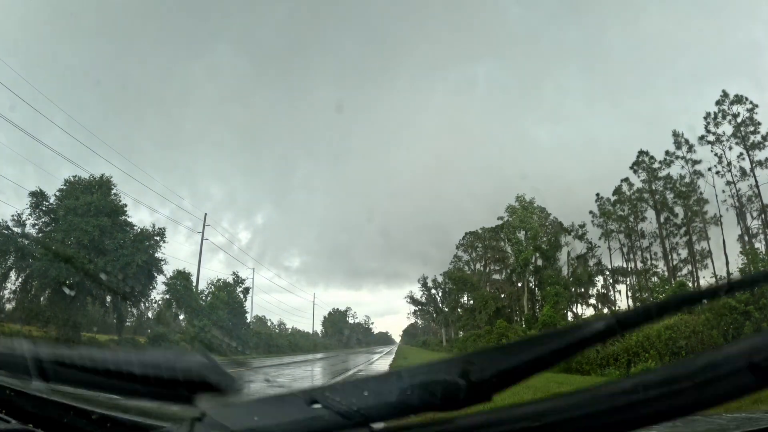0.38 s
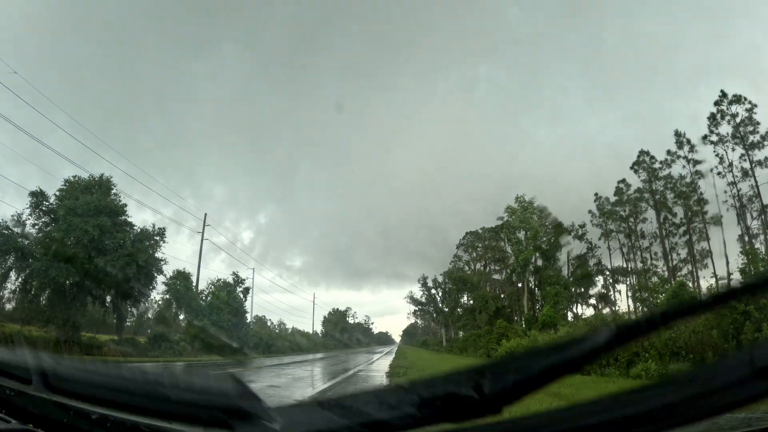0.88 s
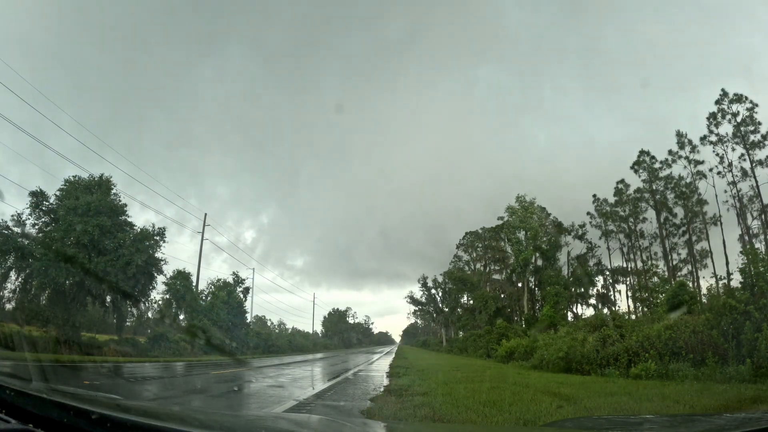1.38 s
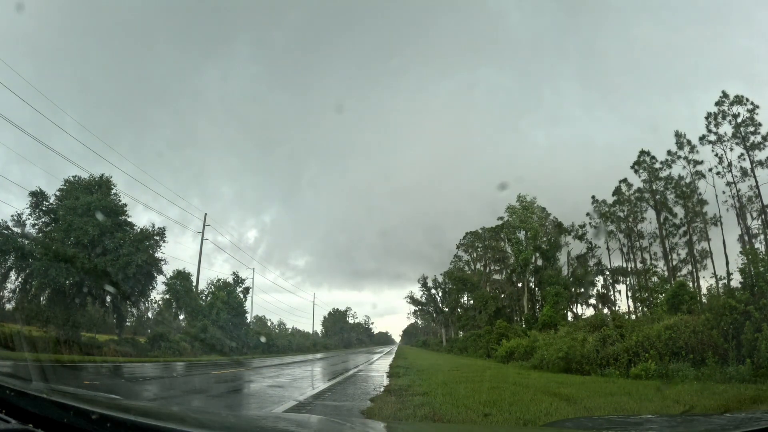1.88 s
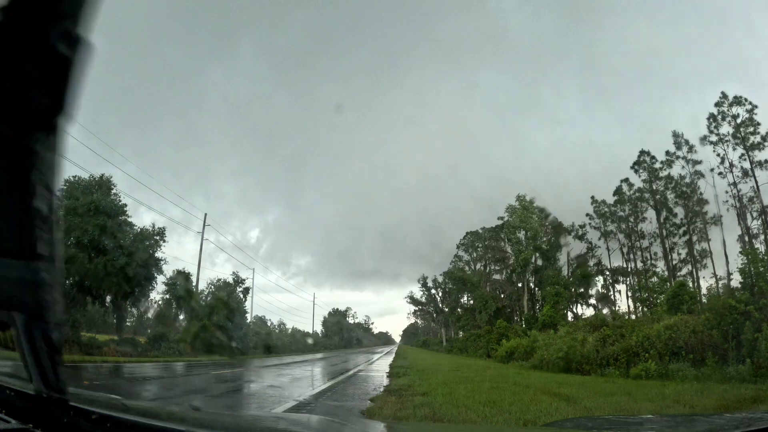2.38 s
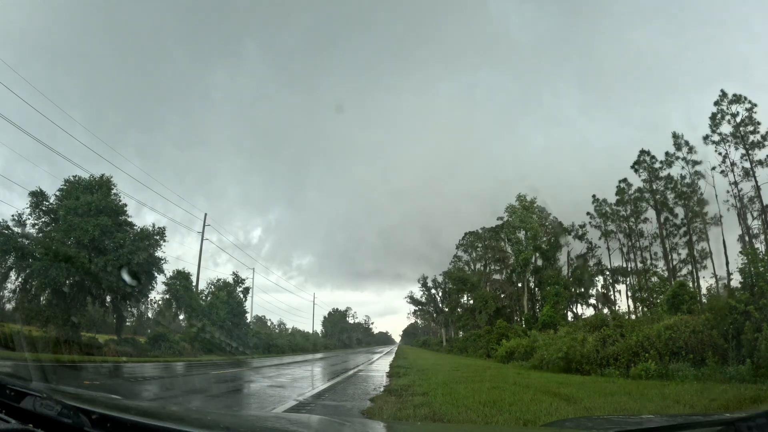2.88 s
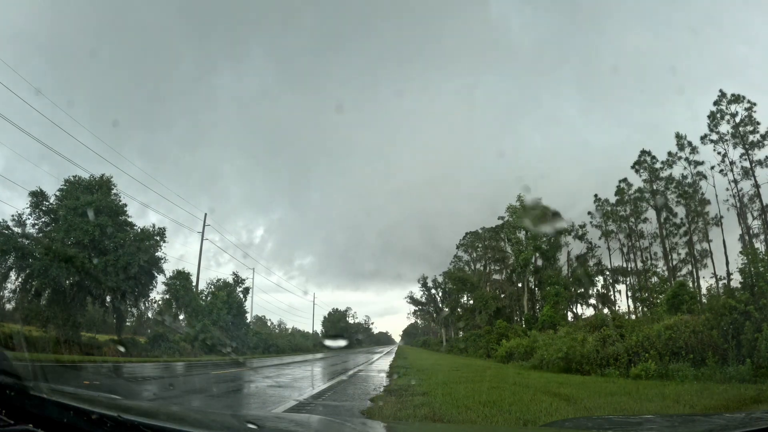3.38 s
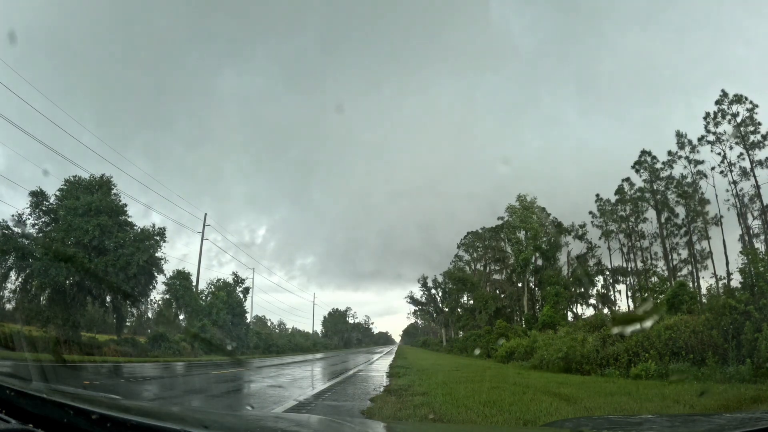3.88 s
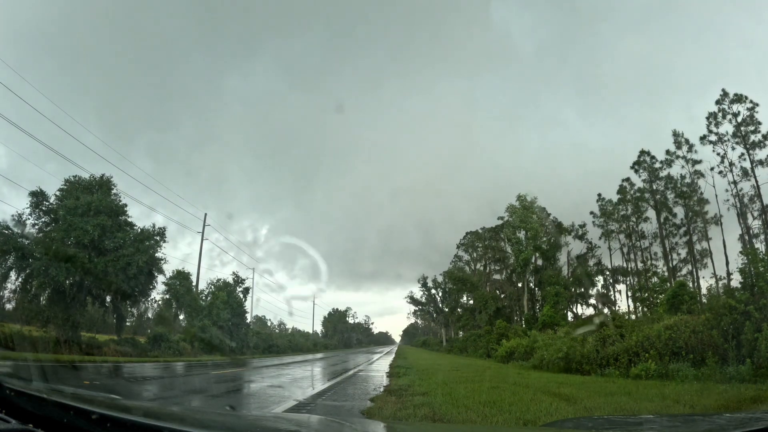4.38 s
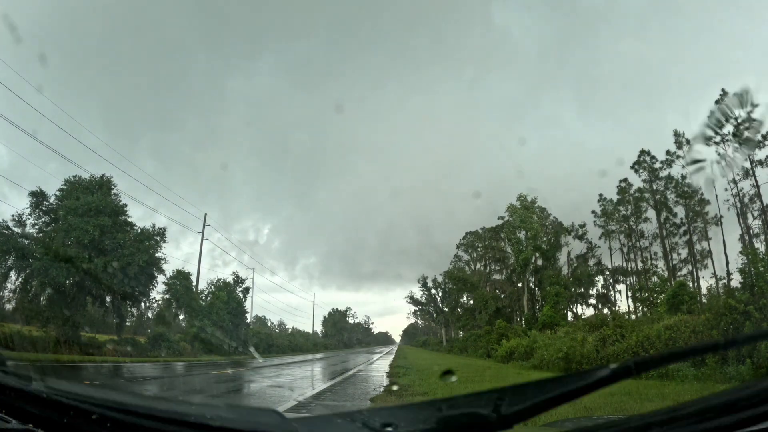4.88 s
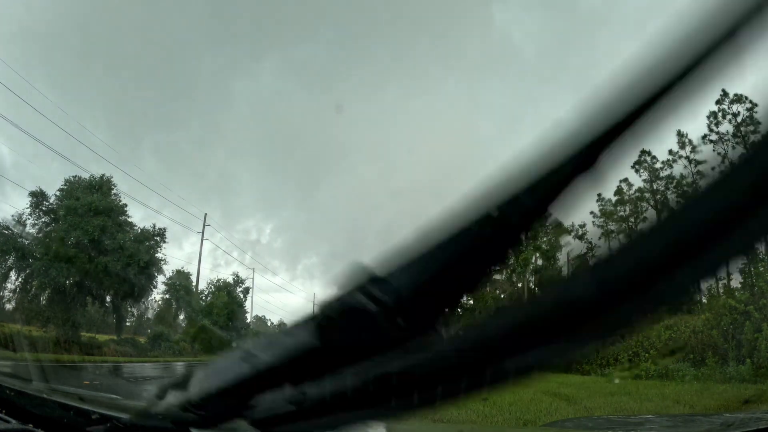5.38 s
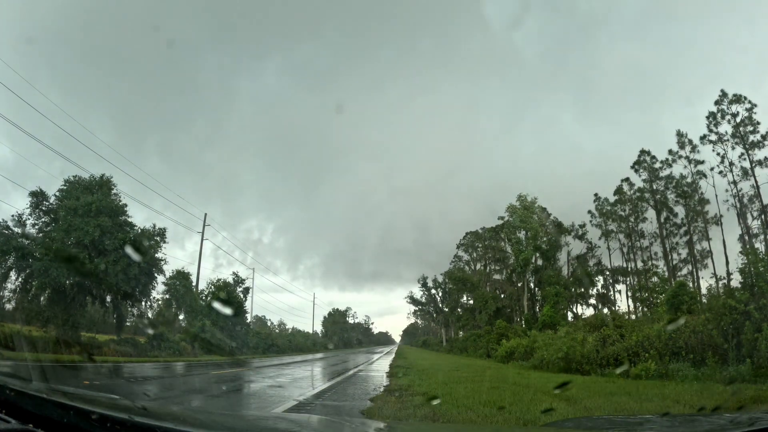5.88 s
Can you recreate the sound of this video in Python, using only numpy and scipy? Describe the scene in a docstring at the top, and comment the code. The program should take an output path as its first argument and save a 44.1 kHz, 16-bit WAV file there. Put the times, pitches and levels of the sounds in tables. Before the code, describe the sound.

Inside a parked car, heavy rain patters on roof and glass while fast wipers thud and clack over a deep idling engine.

```python
"""Heavy rain on a parked car, heard in the cabin: enveloped noise patters on roof and glass, large drops splat and tap.
Wipers knock and click several times at each turn: short noise bursts excite the modes of cowl and linkage.
The engine idles with a deep boom, a sum of shaft orders; a valve ticks at a fixed beat as decaying modes.
Faint steady sines hum and beat beside it, filtered noise rumbles low,
and a hiss of road spray, resonant noise, fades away at the start."""
import sys
import numpy as np
from scipy import signal
from scipy.fft import rfft, irfft
from scipy.io import wavfile
from scipy.ndimage import uniform_filter1d

SR = 44100
rng = np.random.default_rng(int(sys.argv[2]) if len(sys.argv) > 2 else 0)


def waveform_to_disk(signal):
    """Save audio, clipped to [-1, 1], as 16-bit WAV at the path in sys.argv[1]."""
    frames = np.transpose(np.atleast_2d(signal))
    scaled = np.clip(frames, -1, 1) * 32767
    samples = np.round(scaled).astype(np.int16)
    wavfile.write(sys.argv[1], SR, samples)


def decibels_to_gain(level_db):
    """Convert a level in decibels to a linear amplitude gain (20 dB per decade)."""
    exponent = np.asarray(level_db, float) / 20
    return 10 ** exponent


N = 275184  # length of the scene [samples]


def evened(x):
    """Normalization of signal power: scales to rms 1."""
    return x / np.sqrt(np.mean(x ** 2) + 1e-20)


def read(points, hz):
    """Logarithmic frequency scale: interpolates a table evenly along it."""
    f, value = np.transpose(points)
    return np.interp(np.log(hz + 1), np.log(f + 1), value)


def curve(rows, column):
    """Linear interpolation in time: reads one column of a time table at every sample."""
    rows = np.array(rows)
    return np.interp(np.arange(N) / SR, rows[:, 0], rows[:, column])


def add(mix, s, sound):
    """Superposition: adds a sound to the mix, starting at time s [s]."""
    part = mix[..., round(s * SR):][..., :sound.shape[-1]]
    part += sound[..., :part.shape[-1]]


def resonate(x, hz, width):
    """Heterodyne resonance of gain 1: shifts hz down to zero, smooths, and shifts back."""
    carrier = np.exp(2j * np.pi * np.cumsum(hz * np.ones(x.shape[-1])) / SR)
    pole = np.exp(-np.pi * width / SR)
    smoothed = signal.lfilter([1 - pole], [1, -pole], x / carrier)
    return 2 * (carrier * smoothed).real


def body(x, modes):
    """Modal superposition: sums steep resonances, each of two passes wider than their result."""
    total = 0
    for hz, width, db in modes:
        once = resonate(x, hz, 1.5 * width)
        total = total + decibels_to_gain(db) * resonate(once, hz, 1.5 * width)
    return total


def tint(x, table):
    """Spectral shaping: multiplies the spectrum by a table, then scales to rms 1."""
    gain = decibels_to_gain(read(table, np.fft.rfftfreq(N, 1 / SR)))
    return evened(irfft(rfft(x) * gain, N))


def patter(per_s, spread_db, splash_s, smooth):
    """Poisson-like shot noise: random hits of uneven size, each a decaying noisy splash, over a smooth wash."""
    size = decibels_to_gain(spread_db * np.minimum(rng.exponential(1, N), 4))
    hits = size * (rng.random(N) < per_s / SR)
    # energies of overlapping splashes add; the root makes splash_s the amplitude decay time
    energy = signal.lfilter([1], [1, -np.exp(-2 / (splash_s * SR))], hits ** 2)
    splash = np.sqrt(abs(energy))
    return (evened(splash) + smooth) * rng.standard_normal((2, N))


def rain():
    """Impact noise split by panel: the padded roof drums dully, the glass ticks brightly; gusts change mostly the glass."""
    # spectrum of the rain wash: (frequency [Hz], relative density [dB])
    wash = [(90, -14), (125, -12), (180, -15), (290, -20), (750, -33.5), (1040, -33.5), (1570, -42),
            (2650, -48), (3800, -51.5), (4600, -51), (6000, -48.5), (9000, -50.5), (15000, -49.5)]
    # gusts in the rain: (time [s], strength on the glass [dB])
    gusts = [(0, .5), (.43, 0), (.83, -3), (1.67, 2), (2.4, 2), (2.8, 0), (4.66, .5), (5.2, 3), (5.96, 1),
             (6.24, 1)]
    roof = tint(patter(per_s=200, spread_db=1.5, splash_s=0.01, smooth=0.57), wash)
    glass = tint(patter(per_s=400, spread_db=4.5, splash_s=0.011, smooth=0.84), wash)
    low = signal.butter(2, 1700, "low", fs=SR, output="sos")
    high = signal.butter(2, 1700, "high", fs=SR, output="sos")
    strength_db = curve(gusts, 1)
    dull = signal.sosfilt(low, roof) * decibels_to_gain(0.27 * strength_db)
    bright = signal.sosfilt(high, glass) * decibels_to_gain(strength_db)
    return decibels_to_gain(-34) * (dull + bright)


def splats():
    """Impact and spreading of a large drop: a sharp noise burst with a dull slap and a bright spit on top."""
    # large drops: (time [s], slap peak [dB], spit peak [dB], left over right [dB])
    large_drops = [(.402, -43, -46, -8), (1.045, -45, -40, -1), (1.691, -44, -47, 0), (2.08, -50, -43, -1),
                   (3.207, -41.5, -36, 5), (3.674, -45, -36.5, 5), (4.293, -34, -26.5, 5),
                   (4.556, -52, -34, 4), (4.617, -41, -43, 4), (4.8345, -38, -29, 12),
                   (4.953, -41, -36, -1), (5.101, -41, -37, -3), (5.355, -32.5, -27.5, 5),
                   (5.453, -44, -44, 12), (5.726, -49, -41, 4), (5.817, -42, -40, 6),
                   (5.837, -36, -23.5, 2.5)]
    t, out = np.arange(2000) / SR, np.zeros((2, N))
    shape = (1 - np.exp(-t / .0004)) * (np.exp(-t / .003) + .2 * np.exp(-t / .012))
    mid = signal.butter(2, [700, 3800], "band", fs=SR, output="sos")
    high = signal.butter(1, [4000, 11000], "band", fs=SR, output="sos")
    for s, slap_db, spit_db, pan_db in large_drops:
        left, own = rng.standard_normal((2, len(t)))
        burst = np.array([left, .8 * left + .6 * own]) * shape  # sides are alike by 0.8
        slap, spit = signal.sosfilt(mid, burst), signal.sosfilt(high, burst)
        drop = decibels_to_gain(slap_db) * slap / abs(slap).max() + decibels_to_gain(spit_db) * spit / abs(spit).max()
        add(out, s, drop * decibels_to_gain([[pan_db / 2], [-pan_db / 2]]))
    return out


def knocks(table, focus_db, share):
    """Modal excitation: a short stutter drives the cowl; where it lands decides which modes ring most.

    focus_db is the loss of a mode one octave from the strongest region [dB]."""
    # modes of the cowl and arms: (frequency [Hz], width [Hz], level before the focus loss [dB])
    cowl = [(88, 16, 6), (108, 20, 3), (142, 30, 0), (172, 35, 0), (205, 45, 0), (280, 80, 0), (400, 90, 0),
            (520, 100, 0), (760, 100, 0), (950, 60, 5), (1300, 250, -2)]
    t, out = np.arange(4400) / SR, np.zeros((2, N))
    for s, db, centre_hz, length_ms in table:
        stutter = rng.standard_normal((2, len(t)))
        rise = share * max(length_ms, 2) / 1000  # time to the peak of the stutter [s]
        modes = [(hz, width, level - focus_db * np.log2(hz / centre_hz) ** 2) for hz, width, level in cowl]
        ring = body(stutter * (t / rise) ** 2 * np.exp(-2 * t / rise), modes)
        loudness = uniform_filter1d(ring[0] ** 2, 300)
        start_s = max(s - loudness.argmax() / SR, 0)  # puts the loudest moment at s
        add(out, start_s, decibels_to_gain(db) * ring / np.sqrt(2 * loudness.max()))
    return out


def cowl_taps():
    """Localized impact: heavy drops tap the cowl and ring its nearest modes."""
    # taps: (time of the peak [s], level [dB], strongest region [Hz], length [ms], at least 2 in use)
    taps = [(1.009, -41, 433, 3.5), (1.394, -37, 605, 16), (3.029, -36.5, 1406, 1.3),
            (3.295, -49, 1050, 8.5), (4.3, -35.5, 480.3, 4.6), (5.822, -33.5, 499.3, 9),
            (6.046, -38.5, 1340, 2.3), (6.189, -42.5, 504, 8)]
    return knocks(taps, focus_db=24.5, share=.5)


def turns_of(steps, levels):
    """Periodic excitation: the wiper motor's steady clock gives every turn the same steps.

    Returns rows (time [s], level [dB], rest of the step)."""
    first_s, every_s = .199, .6458
    rows = []
    for k, row in enumerate(levels):
        for (delay_s, *rest), db in zip(steps, row):
            rows.append((first_s + k * every_s + delay_s, db, *rest))
    return rows


def arm_thuds():
    """Low-mode impact: the arms thud at stop, blade flip, latch, pull and slack taken up."""
    # steps of a turn: (time after the turn [s], strongest region [Hz], length [ms])
    thud_steps = [(.010, 132, 14), (.066, 172, 11), (.107, 138, 12), (.268, 150, 10), (.291, 173.3, 8.4)]
    # one row per turn: (level of each step [dB], ..)
    thud_levels = [(-22, -34.5, -25, -24, -26), (-20.5, -15, -33.5, -24, -27),
                   (-24.5, -21.5, -23.5, -22.5, -21), (-22, -25.5, -24, -29.5, -22),
                   (-15, -31, -29.5, -26.5, -18.5), (-22.5, -29, -21.5, -23, -30),
                   (-17, -16.5, -19, -24, -21), (-20.5, -18.5, -18.5, -26, -24),
                   (-23.5, -24, -27, -21.5, -22), (-16, -30.5, -19.5)]
    # soft thud as the arms slow before each stop: (time after the turn [s], strongest region [Hz], length [ms])
    wind_up = (-.035, 170, 8)
    soft = turns_of([wind_up], [[-28.5]] * len(thud_levels))
    return knocks(turns_of(thud_steps, thud_levels) + soft, focus_db=26, share=.45)


def arm_clacks():
    """Mid-mode impact: clacks at stop, blade flip, latch, pull and slack taken up."""
    # steps of a turn: (time after the turn [s], strongest region [Hz], length [ms])
    clack_steps = [(.002, 592, 3.9), (.069, 512, 9.1), (.102, 461, 5.3), (.272, 449, 6), (.293, 510, 13)]
    # one row per turn: (level of each step [dB], ..)
    clack_levels = [(-30.5, -30.5, -40, -43, -33.5), (-34, -37.5, -36, -36, -35),
                    (-32.5, -30, -37.5, -39.5, -40), (-30, -34.5, -37.5, -33.5, -36),
                    (-31, -34, -38.5, -34.5, -37.5), (-34.5, -45.5, -37.5, -44.5, -32),
                    (-32, -37.5, -36, -35, -33.5), (-33.5, -25, -40, -32.5, -36),
                    (-29.5, -36.5, -36.5, -37.5, -34), (-36.5, -42.5, -35.5)]
    return knocks(turns_of(clack_steps, clack_levels), focus_db=24.5, share=.5)


def flip_rings():
    """Selective resonance: the flipping blade rings hollow, in a narrow choice of modes."""
    # ring of the blade: (time after the turn [s], strongest region [Hz], length [ms])
    flip_step = (.065, 1000, 9)
    # one value per turn: level [dB]
    flip_levels = [-43, -42, -34, -30.5, -53, -52, -40, -38, -42, -54]
    return knocks(turns_of([flip_step], [[db] for db in flip_levels]), focus_db=88.5, share=.5)


def clicks():
    """Metal-on-metal excitation: a short scrape rings the linkage and a ping at a pivot, nearer the left."""
    # steps at stop, latch, pull and slack taken up: (time after the turn [s], ping over the click [dB])
    click_steps = [(-.001, -20.5), (.0935, -7.5), (.263, -19.5), (.281, -20.5)]
    # one row per turn: (click peak of each step before the lean to the left [dB], ..)
    click_levels = [(-41, -38, -42, -33), (-43.5, -40, -38, -36.5), (-38.5, -38.5, -40, -39),
                    (-51, -40.5, -48, -38), (-41, -38.5, -47, -38), (-41, -39.5, -48, -42),
                    (-47, -37.5, -39, -42), (-58, -37, -40, -38), (-39, -41, -48, -37), (-51, -51)]
    # modes of the linkage, and of the pivot: (frequency [Hz], width [Hz], level [dB])
    linkage = [(1300, 400, 0), (1750, 400, 0), (2100, 400, -1), (2700, 700, -8)]
    pivot = [(3450, 170, 0)]
    t, out = np.arange(1500) / SR, np.zeros((2, N))
    for s, db, ping_db in turns_of(click_steps, click_levels):
        scrape = rng.standard_normal(len(t)) * t * np.exp(-t / .0016)  # strongest at 1.6 ms
        click, ping = body(scrape, linkage), body(scrape, pivot)
        strike = click / abs(click).max() + decibels_to_gain(ping_db) * ping / abs(ping).max()
        add(out, s, decibels_to_gain(db) * strike * decibels_to_gain([[2], [-2.5]]))
    return out


def engine():
    """Harmonic series of shaft orders: near-pure tones waver together; the cabin boom lifts the sixth."""
    # idle speed: (time [s], shaft speed [turns a minute])
    speed = [(.17, 705), (.45, 717), (.9, 720), (1.35, 687), (1.95, 699), (2.25, 677), (2.8, 725),
             (3.15, 697), (3.7, 711), (4.65, 692), (5.25, 717), (5.85, 706)]
    # shaft orders: (multiple of the shaft speed, mean level [dB rms])
    orders = [(2, -55), (3, -49.5), (4, -38), (5, -52.5), (6, -22), (7, -46.5), (8, -63.5)]
    turns = np.cumsum(curve(speed, 1)) / (60 * SR)
    waver = evened(uniform_filter1d(uniform_filter1d(rng.standard_normal(N), 3000), 3000))
    tones = sum(decibels_to_gain(db) * np.cos(2 * np.pi * (k * turns + rng.random())) for k, db in orders)
    return np.sqrt(2) * tones * decibels_to_gain(0.63 * waver)  # waver of 0.63 dB rms


def valve():
    """Impulse response of damped modes: a small valve snaps on a steady clock and rings briefly."""
    # valve modes: (mean frequency [Hz], damping width [Hz], mean envelope peak before the lean to the left [dB])
    valve_modes = [(2420, 120, -54.5), (5760, 170, -56), (6130, 150, -49.5), (8400, 200, -56)]
    t, out = np.arange(1500) / SR, np.zeros(N)
    first_s, every_s = .0685, .17492
    for s in np.arange(first_s, N / SR, every_s):
        for hz, width, db in valve_modes:
            luck = rng.standard_normal()  # moves level and pitch of each mode at each tick
            u = np.pi * width * t
            envelope = u * np.exp(1 - u)  # peak of 1
            tone = np.sin(2 * np.pi * hz * (1 + .008 * luck) * t)
            add(out, s, decibels_to_gain(db + 1.6 * luck) * envelope * tone)
    return out * decibels_to_gain([[1.1], [-1.1]])


def hums():
    """Beating of steady sines: close pairs swell slowly; all are in phase at 0.2 s."""
    # faint hums: (frequency [Hz], level [dB rms])
    hum_tones = [(56.81, -43), (58.57, -38), (68.57, -44), (82.03, -47), (85.16, -44), (86.76, -48),
                 (108.41, -46)]
    t = np.arange(N) / SR - .2
    return np.sqrt(2) * sum(decibels_to_gain(db) * np.cos(2 * np.pi * hz * t) for hz, db in hum_tones)


def spray():
    """Band-filtered noise: tyre spray goes away as a climbing band, with the part that the vent duct favours."""
    # road spray: (time [s], level [dB], centre of the climbing band [Hz])
    spray_path = [(0, -52, 3770), (.15, -56, 3860), (.3, -55.5, 4040), (.6, -56.5, 4240), (.9, -62, 4300),
                  (1.3, -71.5, 4450), (2, -72, 4460), (3, -74, 4520)]
    vent_hz = 4550
    noise = rng.standard_normal((2, N))
    hiss = 0
    for hz in (curve(spray_path, 2), vent_hz):
        hiss = hiss + resonate(resonate(noise, hz, 600), hz, 600)
    return decibels_to_gain(curve(spray_path, 1)) * evened(hiss)


def rumble():
    """Spectrally shaped noise: the body shell drums faintly under engine and rain."""
    # spectrum of the shell: (frequency [Hz], relative density [dB])
    shell = [(12, -16), (25, 21.5), (40, 11.5), (55, 21.5), (85, 26), (110, 16), (160, -41)]
    return decibels_to_gain(-37.5) * tint(rng.standard_normal((2, N)), shell)


def ports(near, other):
    """Interchannel coherence: the right port hears a phase-shifted copy, less alike in the treble."""
    # likeness of the ports: (frequency [Hz], left-right coherence [0 to 1])
    likeness = [(60, .99), (130, .997), (280, .98), (590, .9), (1270, .75), (2730, .5), (4600, .7),
                (8000, .35)]
    # balance of the ports: (frequency [Hz], left over right [dB])
    balance = [(60, -.3), (150, .4), (370, .4), (940, 1.8), (2340, 2.4), (5850, 1.5), (12000, 0)]
    # phase between the ports: (frequency [Hz], lead of the left, negative where the right leads [rad])
    phase_lead = [(30, -.25), (70, -.28), (130, -.2), (300, -.15), (1000, -.3), (1800, -.75), (2670, -1.2),
                  (4130, -.3), (6000, -.3)]
    hz = np.fft.rfftfreq(N, 1 / SR)
    same = np.clip(read(likeness, hz), 0, 1)
    tilt = decibels_to_gain(read(balance, hz) / 2)
    left = rfft(near)
    right = same * left * np.exp(-1j * read(phase_lead, hz)) + np.sqrt(1 - same ** 2) * rfft(other)
    return irfft(np.array([left * tilt, right / tilt]), N)


def scene():
    """Superposition: cabin-filling sounds pass the pair of ports; splats, clicks and ticks keep their own side."""
    wipers = arm_thuds() + arm_clacks() + flip_rings()
    near, other = rain() + cowl_taps() + wipers + spray() + rumble()
    return splats() + clicks() + valve() + ports(near + engine() + hums(), other)


def top_cut(x):
    """Nothing passes above the cut-off."""
    return signal.sosfilt(signal.butter(12, 15100, fs=SR, output="sos"), x)


def record(dry):
    """Linear filtering: the microphone behind its housing loses treble; the first 8 ms fade in."""
    # microphone response, falling in steps: (frequency [Hz], gain [dB])
    microphone = [(4600, 0), (5100, -4), (5350, -9), (6200, -11), (7700, -15), (8200, -19), (10800, -25),
                  (13000, -33), (15000, -43)]
    hz = np.linspace(0, SR / 2, 513)
    colour = signal.firwin2(401, hz, decibels_to_gain(read(microphone, hz)), fs=SR)
    fade_in = np.minimum(np.arange(N) / (.008 * SR), 1)
    heard = signal.oaconvolve(dry, colour[None], "same") * fade_in
    return top_cut(heard)


dry = scene()
out = record(dry)
waveform_to_disk(out)
```